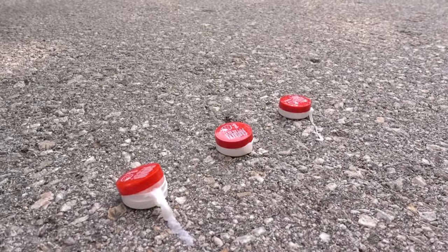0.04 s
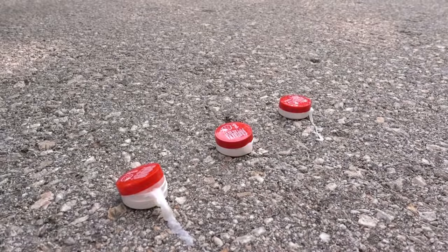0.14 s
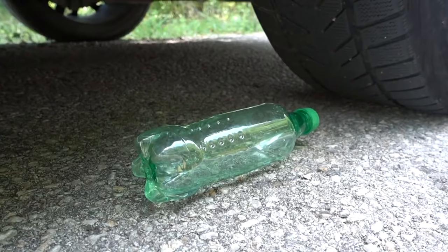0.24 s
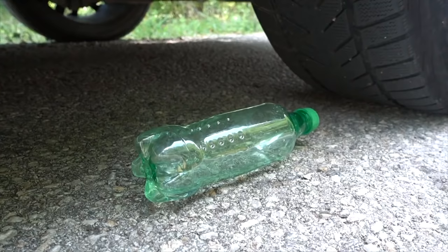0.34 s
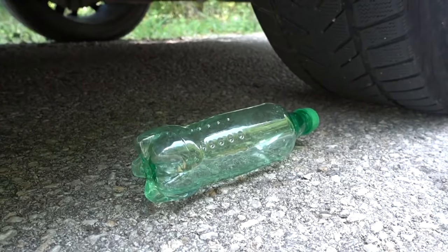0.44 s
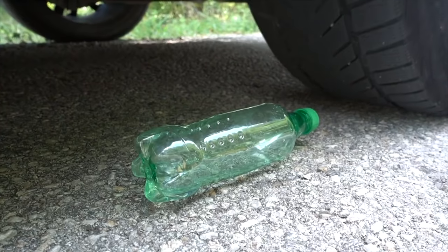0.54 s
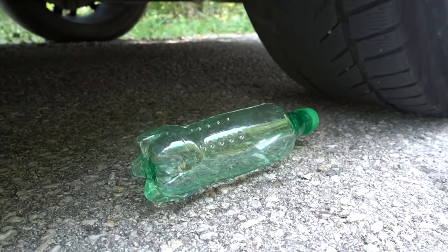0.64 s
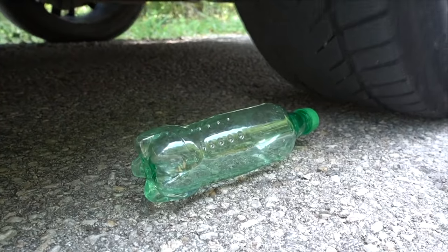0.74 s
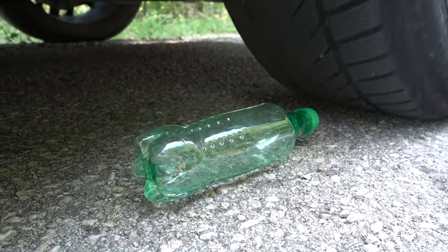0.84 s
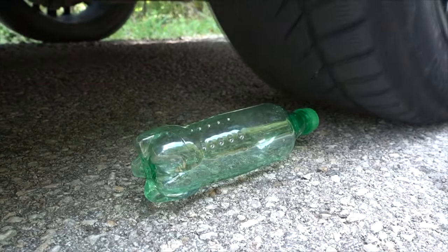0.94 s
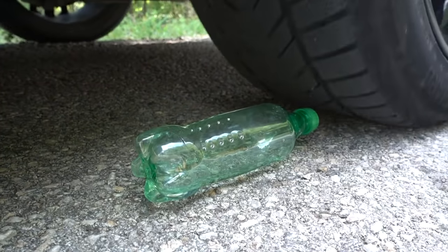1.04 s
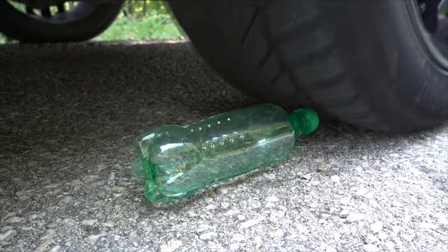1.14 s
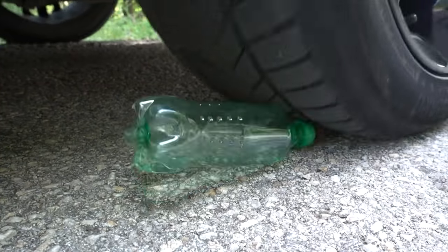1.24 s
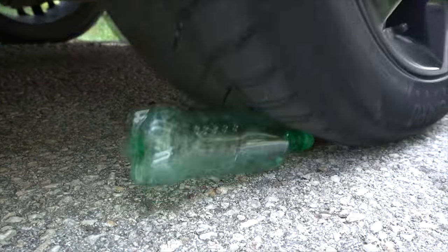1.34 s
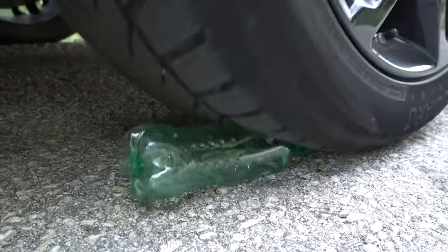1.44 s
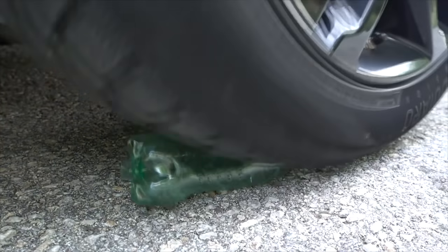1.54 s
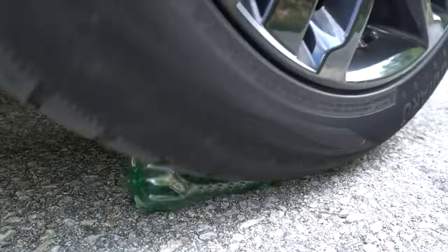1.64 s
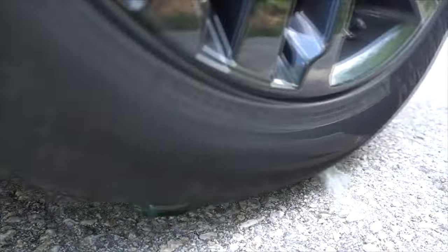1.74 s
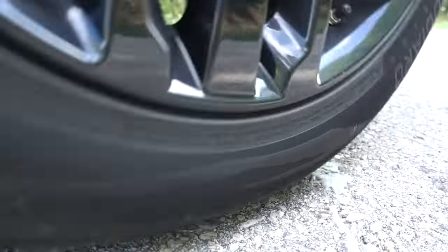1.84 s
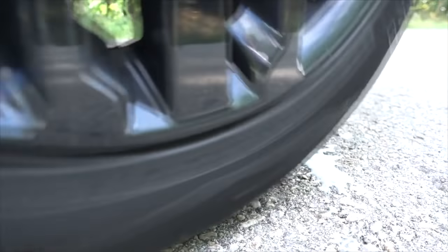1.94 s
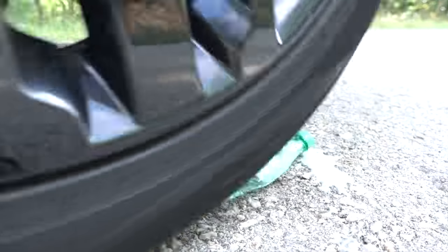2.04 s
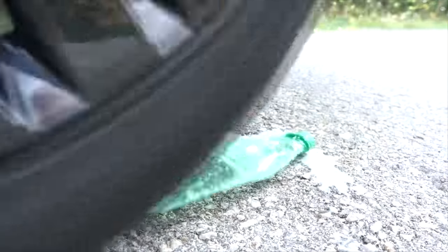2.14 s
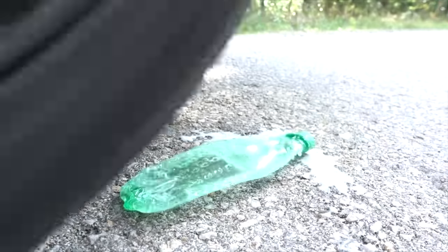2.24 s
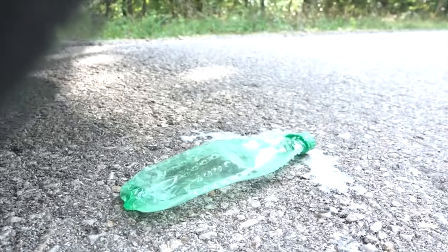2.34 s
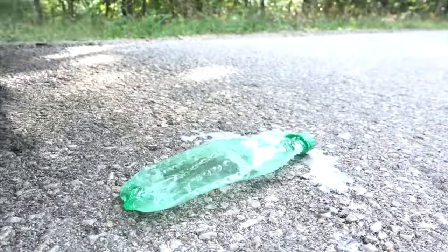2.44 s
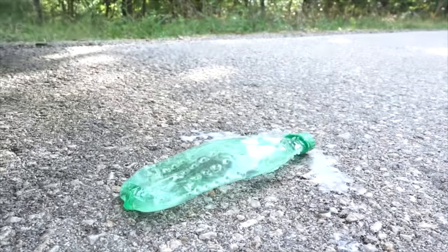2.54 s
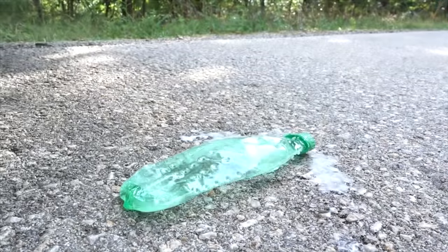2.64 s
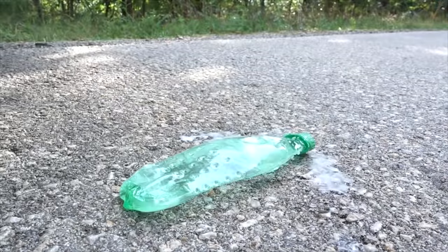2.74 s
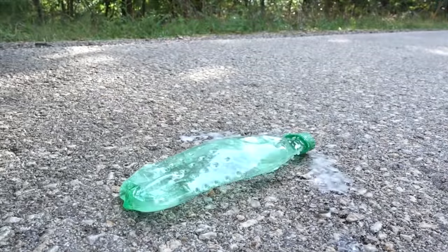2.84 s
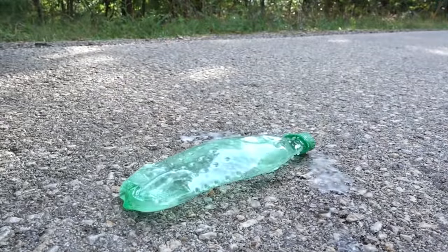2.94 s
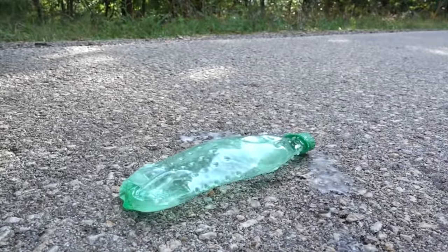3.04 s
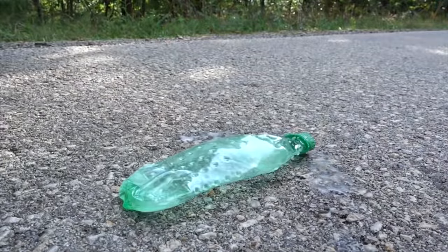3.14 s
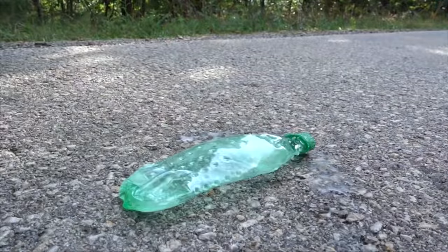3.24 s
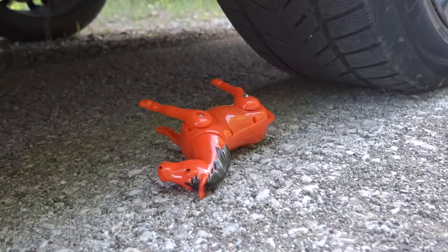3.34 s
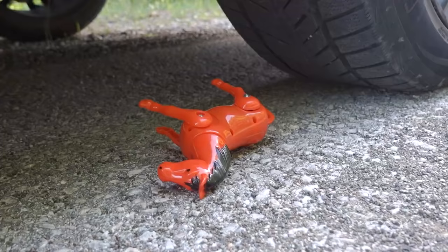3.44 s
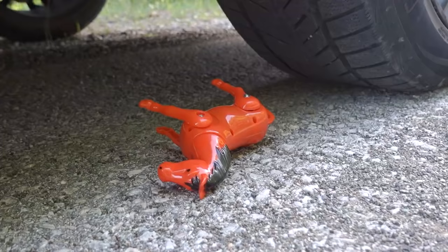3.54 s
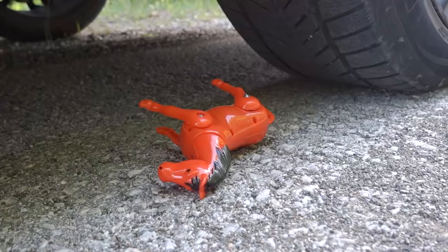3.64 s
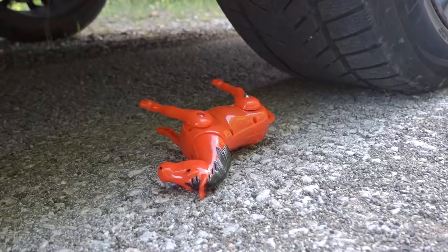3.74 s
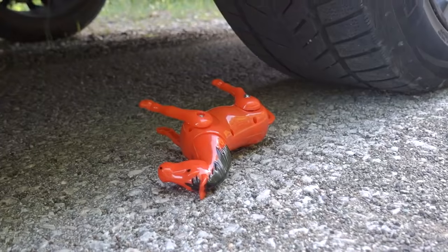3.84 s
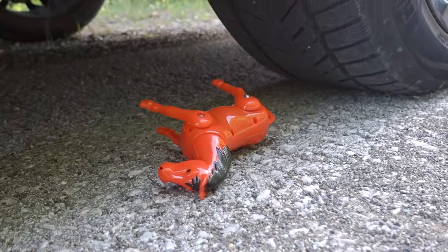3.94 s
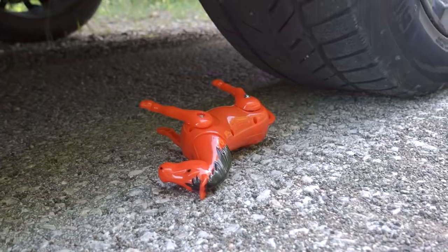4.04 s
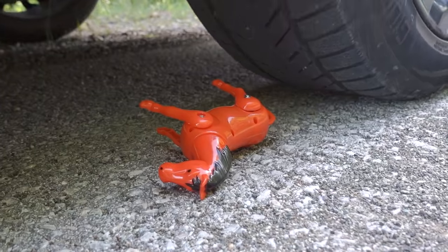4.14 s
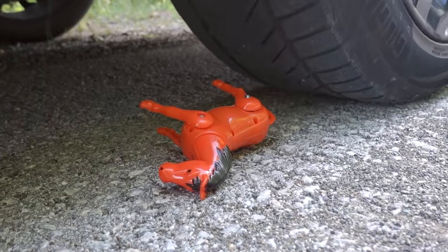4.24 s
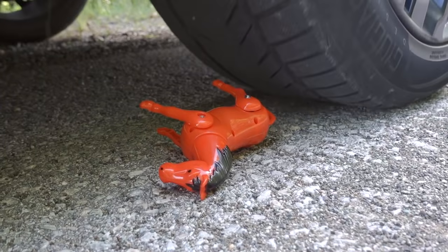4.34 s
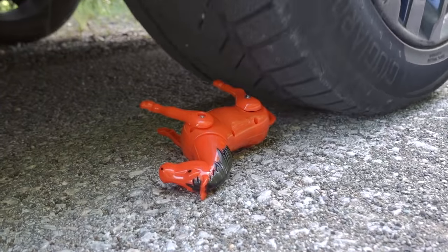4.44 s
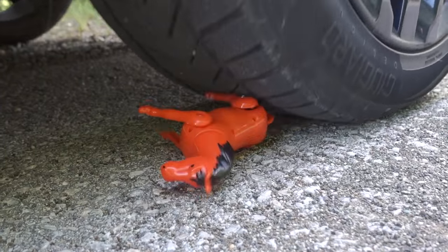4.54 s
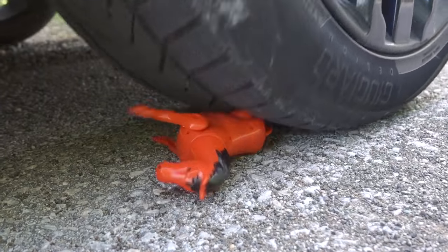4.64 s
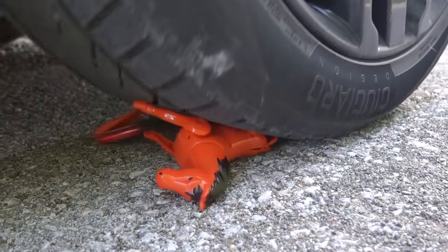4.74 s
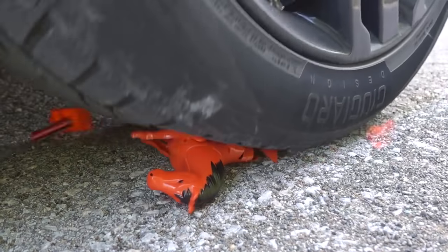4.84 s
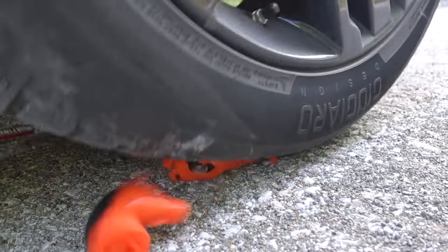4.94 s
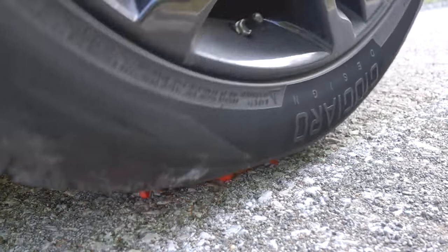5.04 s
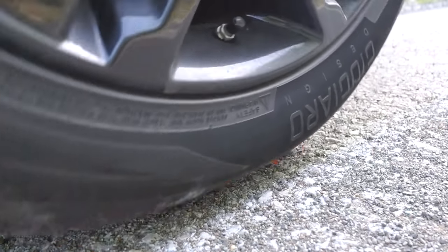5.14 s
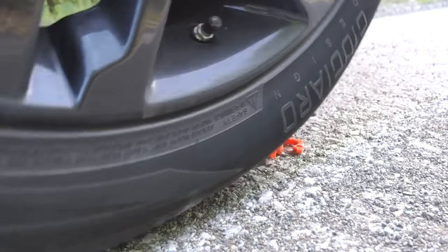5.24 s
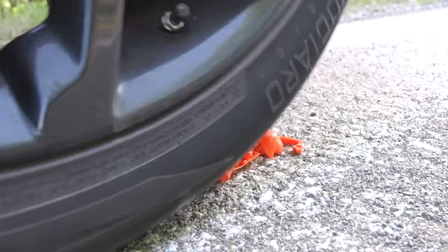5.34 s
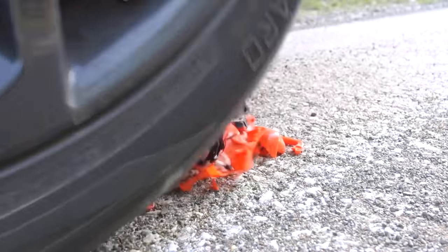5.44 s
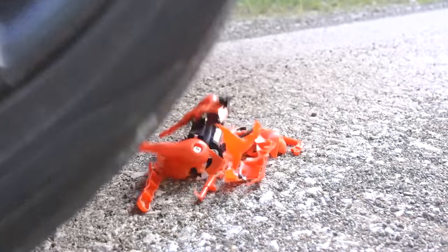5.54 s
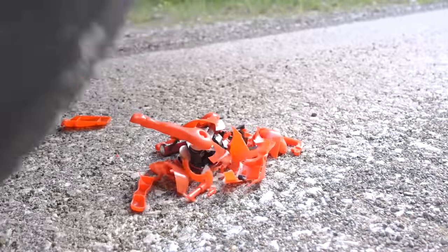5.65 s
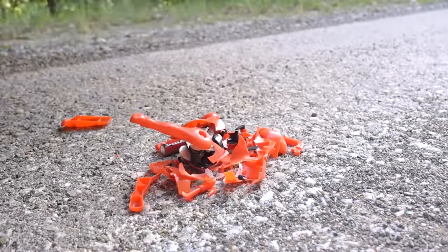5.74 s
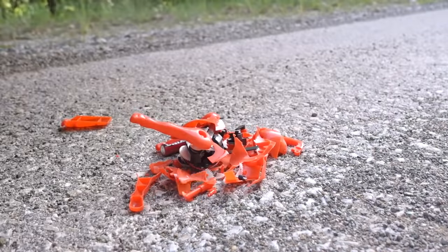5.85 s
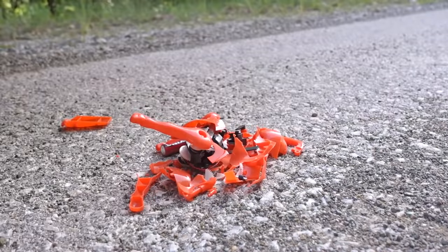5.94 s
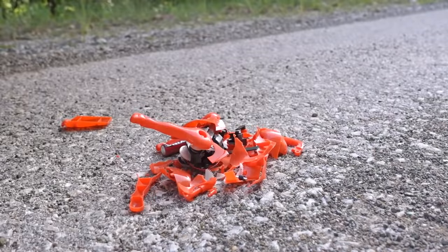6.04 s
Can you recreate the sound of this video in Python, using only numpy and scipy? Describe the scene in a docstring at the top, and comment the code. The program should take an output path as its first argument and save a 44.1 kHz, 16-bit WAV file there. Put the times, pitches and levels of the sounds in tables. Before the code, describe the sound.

Slow tyre crunch on a road: an empty-sounding bottle buckles, spurts and pops back, then a hard hollow toy cracks to pieces under heavy rubber.

```python
"""A bright gritty tyre rush over an engine hum opens the scene: a car creeps over asphalt in two passes.
First the tyre buckles a plastic bottle, which leaks, bursts in a wet jet and pops back into shape.
Then it splinters a hollow plastic toy, and the jolts ring the air inside the tyre.
Shaped noise gives rolling, jet flow and low rumble, decaying modes give the bottle wall and shards,
and resonators excited by impulses give fractures and tread knocks."""
import sys
import numpy as np
from scipy import signal
from scipy.fft import rfft, irfft, next_fast_len
from scipy.io import wavfile
from scipy.ndimage import map_coordinates

SR = 44100
rng = np.random.default_rng(int(sys.argv[2]) if len(sys.argv) > 2 else 0)


def transcribe(u):
    """Save the signal u as a 16-bit wav file named by the first command-line argument.

    u: samples, shape (n,) or (channels, n), limited to [-1, 1]; the rate is SR.
    q: integer samples, one column per channel.
    """
    v = np.clip(np.atleast_2d(u).T, -1, 1)
    q = np.round(v * 32767).astype(np.int16)
    wavfile.write(sys.argv[1], SR, q)


N = 268561
TIME = np.arange(N) / SR  # seconds through the scene
AGE = np.arange(SR // 4) / SR  # seconds through one short event

PASS_S = 3.39  # the second pass begins
TOP_HZ, TOY_TOP_HZ = 16100, 11250  # upper band limits of the first and second pass
SQUEEZE_S = (1.666, 2.04)  # the wheel's weight is on the bottle: from, to
LOAD_S = (4.69, 5.09)  # the wheel's weight is on the toy: from, to

# Engine harmonics. Each row: frequency in Hz, level in dB before a common lift.
ENGINE_HUM = [(193.8, -59.5), (290.7, -64), (586.8, -77)]
# Spectrum of the low rumble. Each row: frequency in Hz, gain in dB.
RUMBLE_SPECTRUM = [(20, -22), (50, -3.5), (120, -6), (200, -13), (340, -24), (700, -74)]
# Stretches of deep rumble, like wind or handling. Each row: start in seconds, end in seconds, level in dB.
RUMBLES = [(0.037, 0.063, -52), (0.475, 0.66, -38.5), (1.382, 1.44, -35), (3.67, 3.94, -44),
           (4.352, 4.51, -54), (4.683, 5.124, -35.5), (5.498, 5.808, -34), (5.907, 5.965, -33)]
RUMBLE_RISE_S, RUMBLE_FALL_DB_PER_S = 0.031, 135
# Dull low thuds, like wind buffets or handling.
# Each row: start in seconds, level in dB, pitch in Hz, 60 dB decay in seconds.
THUDS = [(0.063, -23, 156, 0.05), (0.471, -25, 207, 0.3), (0.574, -27, 492, 0.28), (0.59, -23.5, 130, 0.36),
         (1.43, -21, 120, 0.043), (2.582, -23, 266, 0.078), (2.999, -17.5, 260, 0.063),
         (3.688, -23, 272, 0.21), (3.782, -24.5, 94, 0.2), (3.874, -25.5, 494, .1),
         (3.898, -24.5, 194, 0.21), (5.512, -21.5, 114, 0.16), (5.563, -17, 181, 0.1),
         (5.638, -29, 181, 0.28), (5.672, -21, 194, 0.061), (5.707, -22, 232, .14),
         (5.935, -18.5, 123, .12)]
STEADY_RUMBLE_DB, WHINE_HZ = -56, 4900
LATE_WIDTH_DB = 19  # the low rumble, thuds and whine are wider in stereo in the last part, like wind

# Rolling spectrum of a tyre gone past. Each row: frequency in Hz, gain in dB.
ROAD_SPECTRUM = [(59, -24), (100, 1), (295, -0.5), (492, 4), (583, 1), (721, 1), (1080, -0.5), (1480, 5.5),
                 (2420, -6), (2800, -5), (4200, -14), (8280, -23), (12100, -22.5), (16000, -25)]
# Tyre gone past. Each row: start in seconds, end in seconds, roll level in dB, initial hiss level in dB,
# start of the rasp's growth in seconds (complete before the tyre is heard), rasp level in dB;
# levels before trim.
DEPARTURES = [(0.0, 0.305, -41, -49, -0.74, -39.5), (2.063, 3.371, -44.5, -44, 1, -47.5)]
HISS_FALL_DB_PER_S, GRIT_RISE_S = 10, .36
# Rolling spectrum under the car. Each row: frequency in Hz, gain in dB.
UNDER_SPECTRUM = [(59, -37), (100, -2), (164, -14.5), (188, -2), (345, -5), (455, -2.5), (512, -4),
                  (648, -2.5), (773, -5.5), (11000, -27), (14300, -68), (22000, -120)]
# Tyre drawing near. Each row: start in seconds, contact in seconds, level in dB at contact.
APPROACHES = [(0.334, 1.39, -40), (3.386, 4.626, -42.5)]
CONTACT_M, SPEED_M_PER_S = 0.21, 0.66  # distance of the tread at contact; creeping speed
# Rubber scuffing on grit and plastic, low where the tyre scrubs as it starts.
# Each row: centre in seconds, level in dB, pitch in Hz, half length in seconds (to 1/e).
SCUFFS = [(0.193, -28.5, 1890, 0.011), (0.485, -44.5, 1810, 0.029), (0.604, -33.5, 200, 0.035),
          (0.696, -41.5, 1970, 0.045), (1.027, -49, 3240, 0.032), (1.311, -43.5, 2680, 0.028),
          (1.389, -33.5, 1570, 0.011), (3.13, -32, 1900, 0.013), (3.74, -36, 140, 0.035),
          (3.91, -38.5, 204, 0.086), (4.377, -38.5, 1290, 0.0047), (4.498, -43, 1390, 0.024),
          (4.626, -33.5, 2120, 0.014), (4.655, -27, 2460, 0.014), (5.483, -36, 4170, 0.018),
          (5.684, -40.5, 4760, 0.029), (6.056, -51, 1850, 0.17)]

# Tread resonances. Each row: frequency in Hz, width in Hz, gain in dB.
TREAD_MODES = [(380, 163, -8.5), (503, 52, 1), (664, 63, 1.5), (796, 75, 1), (897, 164, -6)]
# The wheel sinks and the air in the tyre rings. Each row: start in seconds, end in seconds, level in dB.
SURGES = [(1.41, 1.562, -42), (1.805, 2.092, -37.5), (4.703, 4.855, -21), (4.893, 4.966, -21.5),
          (5.02, 5.148, -22)]
SURGE_RISE_S, SURGE_FALL_DB_PER_S = 0.091, 330
CAVITY_HZ = (189.5, 234.3)  # modes of the ring of air inside the tyre
# The ring hums on once the toy is flat.
AFTER_RING_DB, AFTER_RING_END_S, AFTER_RING_FALL_DB_PER_S = -32, 5.29, 48
GROAN_DB, GROAN_FALL_DB_PER_S = -29.5, 72
BOOM_DB, BOOM_RISE_S, BOOM_FALL_DB_PER_S = -23.5, 0.064, 330  # sidewall
JOLT_T60_S = 0.14

# Sharp snaps of grit and plastic. Each row: start in seconds, level in dB before trim, pitch in Hz.
SNAPS = [(0.191, -14.5, 2100), (0.7916, -25.5, 3000), (1.4304, 1.5, 5100), (1.453, -6.5, 3350),
         (2.1125, -1.5, 2560), (2.2486, -17, 2220), (2.3156, -18.5, 2360), (2.395, -4.5, 5530),
         (2.4585, -14, 5350), (2.539, -12, 4970), (2.586, -18, 3500), (2.701, -36, 2930),
         (4.0509, -16.5, 2800), (4.0965, -26, 2860), (4.138, -26.5, 5160), (4.453, -22, 2180),
         (4.4687, -25, 2530), (4.49, -16.5, 2430)]
SNAP_T60_S = 0.022

# Spectrum of the escaping air. Each row: frequency in Hz, gain in dB.
AIR_SPECTRUM = [(59, -40), (100, -8), (135, -15), (185, -1), (398, -1.5), (705, 5.5), (1100, 1.5),
                (1310, 4.5), (2130, -3.5), (9020, -7.5), (10200, -10.5), (11900, -6.5), (16000, -13)]
# Resonance of the opening. Each row: time in seconds, frequency in Hz.
GAP_RESONANCE = [(1.56, 4830), (1.72, 2700), (1.8, 2000), (1.86, 1730), (1.92, 2240), (1.96, 2320),
                 (2.0, 5360), (2.04, 4100)]
GAP_DB = 5  # strength of that resonance
# Leak, then burst. Each row: start in seconds, end in seconds, rush level in dB, spray level in dB.
JETS = [(1.426, 1.445, -23.5, -28), (1.55, 2.025, -22.5, -19)]
JET_ATTACK_S, JET_FALL_DB_PER_S, SEEP_DB = 0.019, 344, -44  # air seeps from the leak to the burst
WATER_S, WATER_RISE_S = 1.67, 0.03  # water reaches the opening
WET_SPLUTTER_DB, WET_RUSH_DB, WET_SPRAY_DB = 4, 3, -6  # what the water changes

# Bottle wall snapping through. Each row: start in seconds, ring level in dB, nominal pitch in Hz,
# crack level in dB relative to the ring before trim.
POPS = [(0.954, -28.5, 730, -23), (1.134, -27, 613, -21), (1.297, -22.5, 680, -1), (1.398, -10.5, 768, 1),
        (1.413, -10, 776, 2.5), (1.444, -14.5, 950, 6), (1.626, -8.5, 925, -25), (1.714, -8, 700, -15),
        (2.056, -11.5, 614, -15), (2.065, -6.5, 1102, -23), (2.072, -11, 720, -1), (2.084, -12, 864, -13),
        (2.116, -3.5, 1160, -12), (2.124, -6.5, 934, -17), (2.158, -19, 970, -2), (2.19, -10.5, 940, -38),
        (2.217, -7.5, 836, -13), (2.696, -23, 684, 3), (3.001, -10, 716, -35), (3.227, -6, 704, -19)]
# Bottle modes. Each row: ratio to the nominal pitch, mean level in dB.
WALL_MODES = [(.3, -15.5), (0.522, -10.5), (0.739, -3), (0.998, 6), (1.218, 0), (1.502, -3.5), (1.95, -1.5),
              (2.55, -41)]
POP_T60_S = 0.049

# The shell fractures and the tread drops onto it. Each row: start in seconds, fracture level in dB before a
# common lift, shard pitch in Hz, jolt level in dB.
CRACKS = [(4.512, -46, 2250, -20.5), (4.6098, -21, 2430, -31), (4.6291, -7.5, 2120, -17),
          (4.645, -6.5, 2600, -16), (4.6835, -7.5, 4630, -14), (4.7106, -11, 2060, -13.5),
          (4.7325, 1, 5000, -27), (4.773, -8, 3950, -12.5), (4.866, -3, 4230, -7),
          (4.9085, -3.5, 6010, -34), (4.9293, -13, 2660, -10.5), (4.9679, -3, 5640, -3.5),
          (4.9968, -19, 5260, -25), (5.0285, -8, 8100, -20), (5.0425, -10, 1580, -2.5),
          (5.0887, -9.5, 3600, -12.5), (5.124, -17, 1840, -13.5), (5.1537, -10.5, 2700, -34),
          (5.179, -11, 3430, -13.5), (5.1965, -10, 3270, -20), (5.2502, -11.5, 3750, -25),
          (5.2624, -8.5, 4050, -21), (5.3194, -15.5, 3920, -28.5), (5.3856, -14.5, 1490, -50),
          (5.3927, -18.5, 7100, -49), (5.41, -25, 1680, -43), (5.446, -22.5, 3480, -39),
          (5.474, -15.5, 4600, -31), (5.568, -26.5, 3770, -50), (5.679, -21, 5170, -53)]
# Spectrum of the toy's shell. Each row: frequency in Hz, gain in dB.
SHELL_SPECTRUM = [(530, -8), (900, -11), (1040, -0.5), (1550, -3.5), (4720, -7), (7780, -7.5),
                  (10900, -11.5), (11400, -25), (12000, -38), (15600, -83), (22000, -120)]
CRACK_T60_S, SECOND_CRACK_S, SECOND_CRACK_DB = 0.011, .007, -9  # each fracture runs on once more
CRACKLE_DB, CRACKLE_SAG_DB_PER_S, CRACKLE_FALL_DB_PER_S = -23.5, 19, 135
CHIP_DB = 11.5  # small random fractures: least peak over the crackle level
DEBRIS_END_S, DEBRIS_DB = 5.69, -46  # loose pieces grind until the tread lifts off

# Stereo spread. Each row: frequency in Hz, side relative to mid in dB before each source's own width.
STEREO_WIDTH = [(60, -31), (300, -24), (900, -11.5), (2400, -5.5), (6000, 0), (15000, 0)]


def amp(db):
    """Amplitude ratio: twenty decibels are a factor of ten."""
    return 10 ** (np.asarray(db) / 20)


def unit(x):
    """Power normalization: scale to rms 1."""
    return x / np.sqrt(np.mean(x ** 2) + 1e-20)


def crest(x):
    """Peak normalization: scale to peak 1."""
    return x / (np.abs(x).max() + 1e-20)


def fade(t60):
    """Exponential damping: a constant loss in dB per second, 60 dB in t60 seconds."""
    return amp(-60 * AGE / max(t60, .002))


def swell(start_s, end_s, attack_s, fall_db_per_s):
    """Envelope: a linear rise, a hold until the end, then exponential decay."""
    rise = np.clip((TIME - start_s) / attack_s, 0, 1)
    return rise * amp(-fall_db_per_s * np.maximum(TIME - end_s, 0))


def wobble(rate):
    """Slow random modulation: a smooth curve through rate random knots a second."""
    knots = rng.standard_normal(int(N * rate / SR) + 4)
    return map_coordinates(knots, [TIME * rate])


def filtered(x, response):
    """Linear filtering: multiply the spectrum by a response of frequency."""
    n = x.shape[-1]
    m = next_fast_len(n + 4096)
    return irfft(rfft(x, m) * response(np.fft.rfftfreq(m, 1 / SR)), m)[..., :n]


def colour(points):
    """Spectral envelope: interpolate (Hz, dB) points on a log frequency axis."""
    hz, db = np.transpose(points)
    return lambda f: amp(np.interp(np.log(f + 1), np.log(hz), db))


def resonant(modes):
    """Modal superposition: damped resonators of (Hz, width Hz, dB) with alternating sign."""
    def response(f):
        return sum((-1) ** k * amp(db) * 1j * f * width / (hz * hz - f * f + 1j * f * width)
                   for k, (hz, width, db) in enumerate(modes))
    return response


def band(x, lo_hz, hi_hz):
    """Band-pass filtering: one soft-edged band at rms 1."""
    return unit(filtered(x, lambda f: 1 / np.sqrt((1 + (lo_hz / (f + 1)) ** 8) * (1 + (f / hi_hz) ** 8))))


def noise(size=N):
    """Uncorrelated excitation: independent mid and side noise."""
    return rng.standard_normal((2, size))


def grains(rate, spread_db):
    """Random impact process: tiny impulses of uneven size, rate per second on average, rms 1."""
    sizes = amp(spread_db * np.minimum(rng.exponential(size=N), 3))
    return unit(noise() * sizes * (rng.random(N) < rate / SR))


def add(track, s, sound):
    """Superposition: mix a sound in at time s."""
    part = track[:, max(round(s * SR), 0):][:, :sound.shape[-1]]
    part += sound[..., :part.shape[-1]]


def fracture(t60, tail_db):
    """Brittle stress release: a sudden step, a quick chatter and a faint tail."""
    step = 4 * crest(np.exp(-AGE / .0001) * np.cos(2 * np.pi * 3500 * AGE)) * [[1], [.4]]
    tail = amp(tail_db) * fade(.1)
    return step + noise(len(AGE)) * (fade(t60) + tail)


def placed(pair, width_db, pan_db):
    """Mid-side stereo: bass near mono, treble wide; pan_db is left over right at 2.2 kHz."""
    mid = pair[0]
    side = amp(width_db) * filtered(pair[1], colour(STEREO_WIDTH))
    shade = colour([(250, 0), (2200, pan_db / 2), (8000, 0)])
    return filtered(np.array([mid + side, mid - side]), lambda f: np.array([shade(f), 1 / shade(f)]))


def underbody(x):
    """Diffuse reflection: a brief scatter between the road and the floor of the car."""
    tail = noise(len(AGE)) * fade(0.32) * (AGE > .003)
    return signal.fftconvolve(x[:1], tail / np.linalg.norm(tail[0]), axes=1)[:, :N]


def radiated(x):
    """Radiation efficiency: small shells radiate little bass, and scatter briefly under the car."""
    x = filtered(x, lambda f: (1j * f / (1j * f + 90)) ** 2)
    return x + amp(-13.0) * underbody(x)


def glancing(x, wall_db, reach_s):
    """Early reflection: weak delayed copies off the road, the tyre and the sill."""
    lags = reach_s * rng.uniform(.15, 1, size=6)
    gain = amp(wall_db)

    def response(f):
        echoes = np.exp(-2j * np.pi * np.outer(lags, f)).sum(0)
        return (1 + gain * echoes) / np.sqrt(1 + len(lags) * gain ** 2)
    return filtered(x, response)


def background():
    """Tones and filtered noise: engine harmonics, a faint whine, deep rumble and damped low thuds."""
    hum = sum(amp(db + 3 + 2 * wobble(6)) * np.sin(2 * np.pi * hz * TIME + .3 * wobble(7))
              for hz, db in ENGINE_HUM)
    stretches = sum(amp(db) * swell(start, end, RUMBLE_RISE_S, RUMBLE_FALL_DB_PER_S)
                    for start, end, db in RUMBLES)
    unsteady = amp(2.5 * wobble(12))
    rumble = unit(filtered(noise(), colour(RUMBLE_SPECTRUM)))
    out = (stretches + amp(STEADY_RUMBLE_DB)) * unsteady * rumble
    out[0] += hum
    whine = unit(filtered(noise(), resonant([(WHINE_HZ, 130, 0)])))
    out += amp(-69) * (TIME > PASS_S) * whine
    for s, db, hz, t60 in THUDS:
        push = crest(np.sin(2 * np.pi * hz * AGE) * AGE * fade(0.36 * t60))
        rough = filtered(noise(len(AGE)) * fade(t60), resonant([(hz, 0.75 * hz, 0), (490, 140, -14)]))
        thud = .7 * push + crest(band(rough, 40, 620))
        add(out, s, amp(db) * crest(thud))
    out[1] *= amp(LATE_WIDTH_DB * (TIME > LOAD_S[0]))
    return out


def grit(spectrum):
    """Granular contact noise: many tiny stones shifting under rubber."""
    stones = .35 * grains(rate=1200, spread_db=3)
    return filtered(noise() + stones, colour(spectrum))


def departure():
    """Rolling contact noise: behind the wheel the rush is brighter, its hiss fading over a steady rasp."""
    road = grit(ROAD_SPECTRUM)
    body = band(road, 110, 1170) * amp(2.0 * wobble(19))
    rasp = band(road, 2340, 4100)
    fizz = band(road, 6200, 17700)
    out = np.zeros((2, N))
    for start, end, roll_db, hiss_db, grit_s, grit_db in DEPARTURES:
        hiss = amp(hiss_db - HISS_FALL_DB_PER_S * np.maximum(TIME - start, 0))
        scrape = amp(grit_db) * np.clip((TIME - grit_s) / GRIT_RISE_S, .33, 1)
        rolling = amp(roll_db + 2.5) * body + amp(-1.5) * scrape * rasp + amp(-1) * hiss * fizz
        out += swell(start - .01, end, 0.0076, 830) * rolling
    return out


def approach():
    """Spherical spreading: grit pressed by the tread, dull under the car, grows as inverse distance."""
    under = grit(UNDER_SPECTRUM)
    stones = band(grains(rate=70, spread_db=3), 500, 2600)
    body = (band(under, 130, 3160) + amp(-7.5) * stones) * amp(3.4 * wobble(14))
    fizz = band(grit([(5000, 4.5), (9000, -5.5), (16000, -10)]), 2050, 20000)
    # rolling on beyond the toy
    out = swell(LOAD_S[1], TIME[-1], .3, 0) * (amp(-49.5) * body + amp(-58.5) * fizz)
    for start, contact, db in APPROACHES:
        distance_m = CONTACT_M + SPEED_M_PER_S * np.maximum(contact - TIME, 0)
        rolling = amp(db) * CONTACT_M / distance_m * body + amp(-60.5) * fizz
        out += swell(start - .02, contact, 0.023, 600) * rolling
    return out


def scuffs():
    """Sliding friction: short swells of rubber slipping over stones."""
    out = np.zeros((2, N))
    middle = AGE[-1] / 2
    for s, db, hz, length in SCUFFS:
        rub = unit(filtered(noise(len(AGE)), lambda f: resonant([(hz, hz, 0)])(f) ** 2))
        add(out, s - middle, amp(db) * rub * np.exp(-((AGE - middle) / length) ** 2))
    return out


def tyre():
    """Cavity resonance: collapses knock the tread, the loaded sidewall booms and the enclosed air rings."""
    tread = resonant(TREAD_MODES)
    groan = unit(filtered(grains(rate=770, spread_db=1.5), tread))
    out = amp(GROAN_DB) * swell(*LOAD_S, .015, GROAN_FALL_DB_PER_S) * groan
    for s, _, _, db in CRACKS:
        blow = noise(len(AGE)) * (fade(JOLT_T60_S) + 2 * fade(0.0032))
        add(out, s, amp(db) * crest(filtered(blow, tread)))
    ring = sum(amp(db) * swell(start, end, SURGE_RISE_S, SURGE_FALL_DB_PER_S) for start, end, db in SURGES)
    ring += amp(AFTER_RING_DB) * swell(LOAD_S[1], AFTER_RING_END_S, 0.19, AFTER_RING_FALL_DB_PER_S)
    quarter_turn = [[0], [np.pi / 2]]  # phase of side against mid
    for hz, db in zip(CAVITY_HZ, (2, -10)):
        out += amp(db) * ring * np.sin(2 * np.pi * hz * TIME + .1 * wobble(16) + quarter_turn)
    boom = amp(BOOM_DB) * swell(*LOAD_S, BOOM_RISE_S, BOOM_FALL_DB_PER_S)
    boom += amp(-40) * swell(*SQUEEZE_S, 0.11, 58)
    boom += amp(-43.5) * swell(LOAD_S[1], DEBRIS_END_S, .1, 110)
    return out + boom * band(noise(), 95, 290)


def snaps():
    """Impulsive excitation: single stones and creases give way with a bright tick over a lower body."""
    out = np.zeros((2, N))
    for s, db, hz in SNAPS:
        modes = resonant([(0.22 * hz, 0.23 * hz, -4), (hz, 0.36 * hz, 0)])
        tick = filtered(fracture(SNAP_T60_S, tail_db=-31), modes)
        add(out, s, amp(db - 3.0) * crest(tick))
    return out


def jet():
    """Turbulent jet noise: air leaks, then blasts through a changing gap; water adds splutter, dulls spray."""
    hz, t, z = signal.stft(noise() + 0.29 * grains(rate=1800, spread_db=8), SR, nperseg=256)
    centre = np.interp(t, *np.transpose(GAP_RESONANCE))
    z = z * amp(GAP_DB * np.exp(-(np.log((hz[:, None] + 1) / centre) / 0.28) ** 2))
    flow = filtered(signal.istft(z, SR, nperseg=256)[1][:, :N], colour(AIR_SPECTRUM))
    water = np.clip((TIME - WATER_S) / WATER_RISE_S, 0, 1)
    wet = band(flow, 150, 3000) * amp(1.7 * wobble(160) + wobble(30))
    mid = band(flow, 2350, 7600) * amp(0.81 * wobble(90))
    high = band(flow, 9300, 15600) * amp(1.8 * wobble(70.06))
    rush = amp(-7.5 + WET_SPLUTTER_DB * water) * wet + amp(-1.5 + WET_RUSH_DB * water) * mid
    spray = amp(-5.5 + WET_SPRAY_DB * water) * high
    seep = swell(JETS[0][0], JETS[1][0], JET_ATTACK_S, JET_FALL_DB_PER_S)
    out = amp(SEEP_DB) * seep * (1.9 * wet + 0.65 * mid + 0.17 * high)
    for start, end, rush_db, spray_db in JETS:
        gust = swell(start, end, JET_ATTACK_S, JET_FALL_DB_PER_S)
        out += gust * (amp(rush_db) * rush + amp(spray_db) * spray)
    # the last air runs out
    fizzle = amp(-45.5) * swell(*SQUEEZE_S, 0.086, 40) * (wet + 0.57 * mid + 0.16 * high)
    # the wall creases
    crinkle = amp(-28.5) * swell(*SQUEEZE_S, .1, 92) * band(grains(rate=210, spread_db=2), 430, 3100)
    return out + fizzle + crinkle


def bottle():
    """Snap-through buckling: a wall panel flips, and its size sets the pitch of a short hollow ring."""
    out = np.zeros((2, N))
    ratio, mode_db = np.transpose(WALL_MODES)
    signs = (-1) ** np.arange(len(ratio))
    for s, db, hz, crack_db in POPS:
        detune, strength = rng.standard_normal((2, len(ratio)))
        swing = np.sin(2 * np.pi * np.outer(hz * ratio * (1 + 0.038 * detune), AGE))
        ring = (amp(mode_db + 2 * strength) * signs) @ swing * fade(POP_T60_S)
        crack = crest(band(noise(len(AGE)) * fade(0.031), 1700, 6100))
        rattle = crest(band(noise(len(AGE)) * fade(0.044), 400, 1630))
        pop = crest(ring) * [[1], [.6]] + amp(crack_db - 6.0) * crack + amp(-3.5) * rattle
        add(out, s, amp(db) * pop)
    return out


def shard(hz):
    """Modal ringing: one fracture of the shell excites a shard of its own size."""
    modes = resonant([(hz, .13 * hz, 5), (1.9 * hz, .1 * hz, 1)])
    shell = colour(SHELL_SPECTRUM)
    return crest(filtered(fracture(CRACK_T60_S, tail_db=-12), lambda f: shell(f) * (1 + modes(f))))


def splinters(count, pitch_hz, spread, cycles):
    """Damped free vibration: tiny shards each ring a few cycles; rms 1 while the toy breaks."""
    start, end = LOAD_S[0], DEBRIS_END_S + .1
    when, pitch, size, angle = rng.random((count, 4)).T
    hz = np.minimum(pitch_hz * 2 ** (spread * (2 * pitch - 1)), TOY_TOP_HZ)
    phase = np.outer(hz, AGE[:SR // 80])  # in cycles
    rings = np.sin(2 * np.pi * phase) * amp(-60 * phase / cycles + 20 * size[:, None] ** 2)
    at = ((start + when * (end - start)) * SR).astype(int)[:, None] + np.arange(phase.shape[1])
    aims = (np.ones(count), np.cos(np.pi * angle))  # mid and side gains
    pair = np.array([np.bincount(at.ravel(), (rings * aim[:, None]).ravel(), N)[:N] for aim in aims])
    return unit(pair) * np.sqrt((end - start) * SR / N)


def toy():
    """Brittle fracture: cracks come in pairs over chips and a splintering crackle that weakens under load."""
    out = np.zeros((2, N))
    spreads = rng.uniform(-1, 1, (len(CRACKS), 2))
    for (s, db, hz, _), (lag, size) in zip(CRACKS, spreads):
        add(out, s, amp(db + 3) * shard(hz))
        add(out, s + SECOND_CRACK_S * 2.0 ** lag, amp(db + 3 + SECOND_CRACK_DB) * shard(hz * 1.83 ** size))
    sag_db = CRACKLE_SAG_DB_PER_S * np.maximum(TIME - LOAD_S[0], 0)
    crush = amp(CRACKLE_DB - sag_db) * swell(*LOAD_S, 0.041, CRACKLE_FALL_DB_PER_S)
    level = crush + amp(DEBRIS_DB) * swell(LOAD_S[1], DEBRIS_END_S, 0.28, 87)
    for when, size, strength in rng.random(size=(60, 3)):  # chips
        s = LOAD_S[0] + when * (DEBRIS_END_S - LOAD_S[0])
        add(out, s, amp(CHIP_DB + 8.9 * strength) * level[int(s * SR)] * shard(2000 * 4 ** size))
    grinding = unit(filtered(grains(rate=2600, spread_db=2.5) + .4 * noise(), colour(SHELL_SPECTRUM)))
    crackle = 0.4 * splinters(count=900, pitch_hz=4200, spread=1.35, cycles=25) + 0.9 * grinding
    return out + level * crackle * amp(-1.5 + 3 * wobble(90))


def scene():
    """Superposition of sources: the objects lie near the centre; road and tyre lean left in the mid treble."""
    low = placed(background(), width_db=-1, pan_db=0)
    road = placed(approach() + scuffs() + departure(), width_db=1.5, pan_db=7.0)
    air = glancing(jet(), wall_db=-20, reach_s=.008)
    first = placed(radiated(bottle()), width_db=-8.5, pan_db=-0.5) + placed(air, width_db=-4.0, pan_db=-0.8)
    shards = glancing(radiated(toy() + snaps()), wall_db=-24.5, reach_s=0.0071)
    second = placed(shards, width_db=0.5, pan_db=0.7) + placed(tyre(), width_db=4.0, pan_db=6.0)
    return low + road + first + second


def record(dry):
    """Saturation and band limiting: peaks are rounded off; the second pass has the lower band limit."""
    x = dry / (1 + np.abs(dry / .78) ** 4) ** (1 / 4)

    def low_pass(top_hz):
        """Steep low-pass filtering: little remains above top_hz."""
        return filtered(x, lambda f: 1 / (1 + (f / top_hz) ** 160))
    return np.where(TIME < PASS_S, low_pass(TOP_HZ), low_pass(TOY_TOP_HZ))


dry = scene()
out = record(dry)
transcribe(out)
```